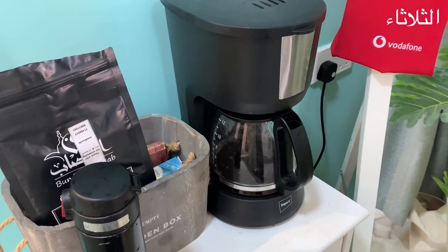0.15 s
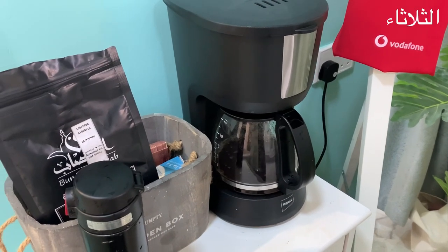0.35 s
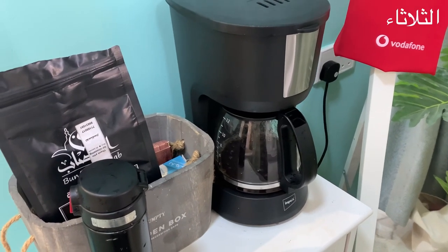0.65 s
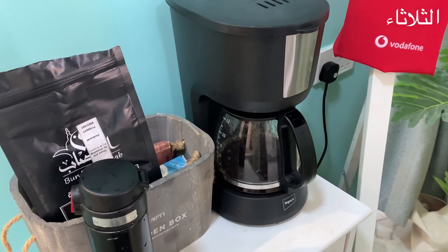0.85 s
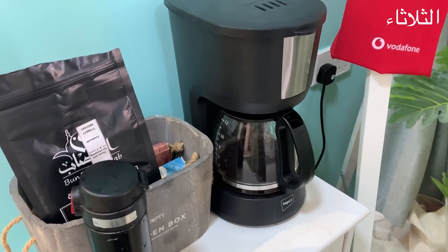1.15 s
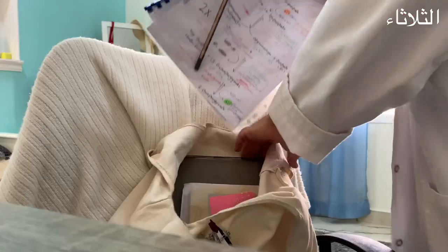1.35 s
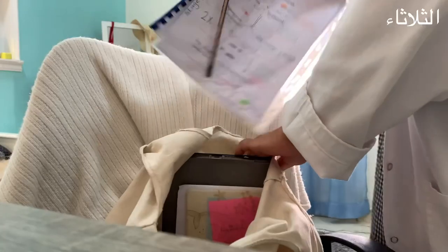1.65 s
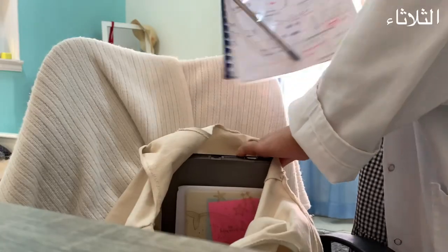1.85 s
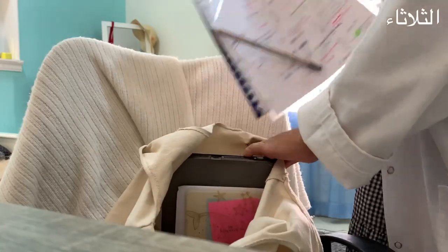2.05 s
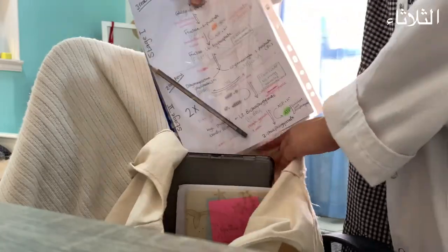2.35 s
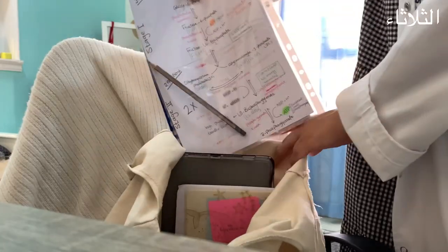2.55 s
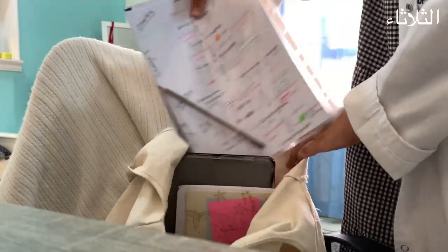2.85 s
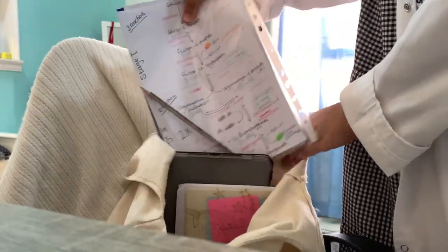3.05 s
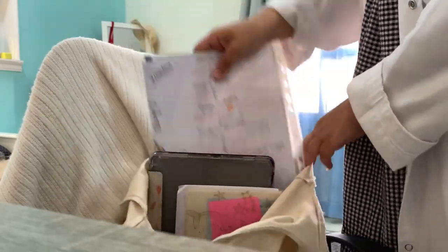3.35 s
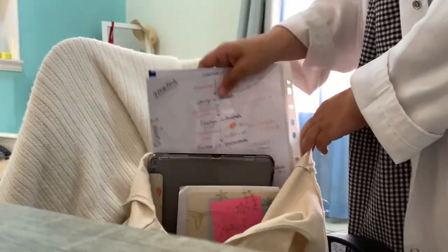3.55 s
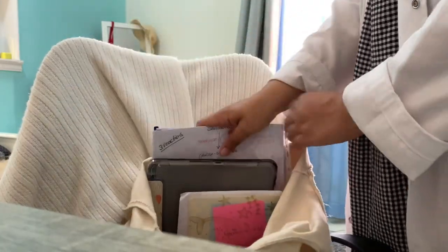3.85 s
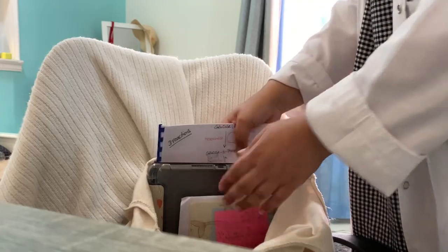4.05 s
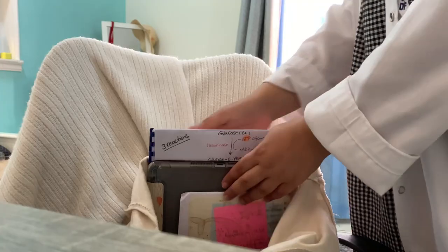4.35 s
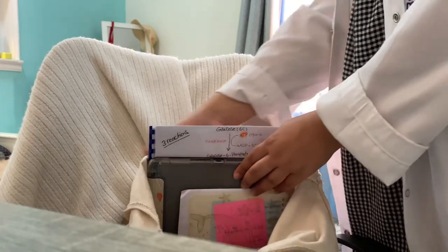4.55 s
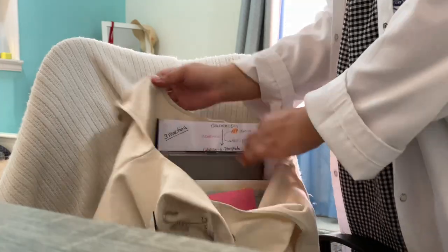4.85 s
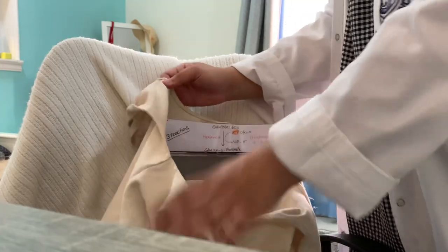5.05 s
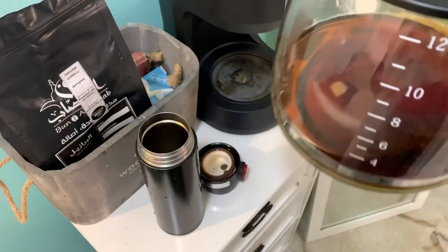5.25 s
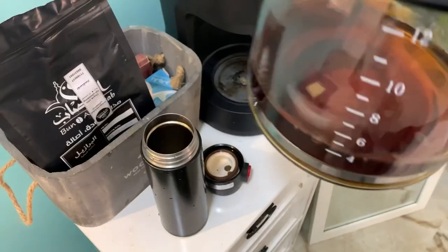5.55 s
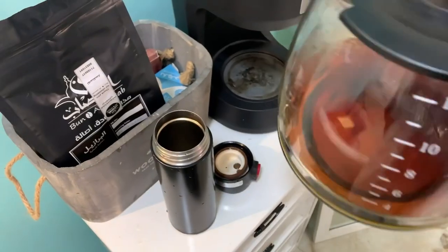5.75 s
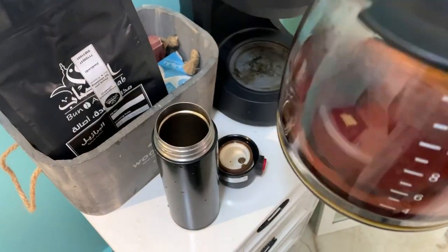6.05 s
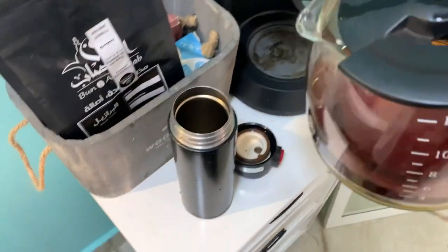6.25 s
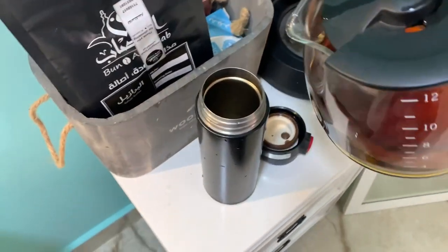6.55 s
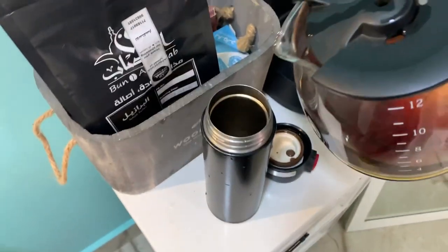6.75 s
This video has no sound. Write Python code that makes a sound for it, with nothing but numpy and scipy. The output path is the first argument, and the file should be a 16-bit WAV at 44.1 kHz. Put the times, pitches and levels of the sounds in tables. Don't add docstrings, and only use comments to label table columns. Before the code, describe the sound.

From 0 to 1.3 s a coffee machine gurgles up close: rapid, uneven, hollow bubble knocks in a plastic housing. A strong gulp and steam spurt hits near 0.53 s, calms around 0.9 s, then bubbling swells from 1.1 s until a hard cut. From 1.3 s cloth drags softly on a chair with light paper snaps; a bright plastic click comes near 1.86 s. Scraping and crackling thicken from 2.3 s, with a low shove at 3.0 s. The folder lands with the heaviest thud at 3.7 s, followed by sharp snaps at 3.9 and 4.2 s and cloth bumps near 4.75 s. At 5.26 s it cuts to a quiet room: sleeve swish until about 5.5 s, tiny glass-lid ticks at 5.7-6.2 s, a soft jug knock and faint slosh at 6.5 s, then nearly only hiss, low room air and barely audible bumps.

```python
import sys
import numpy as np
from scipy import signal
from scipy.fft import rfft, irfft
from scipy.io import wavfile
from scipy.ndimage import uniform_filter1d

SR = 44100
rng = np.random.default_rng(int(sys.argv[2]) if len(sys.argv) > 2 else 0)


def magnitude_from_level(level_db):
    exponent = np.asarray(level_db, float) / 20
    return 10 ** exponent


def persist_wave(psi):
    counts = np.round(np.clip(psi, -1, 1) * 32767).astype(np.int16)
    wavfile.write(sys.argv[1], SR, np.atleast_2d(counts).T)


N = 304290


# [t/s, spray level/dB, build/s, hold/s]
SURGES = [
    (0.0, -60, 0.012, 0.69),
    (.106, -51.5, 0.0061, 0.0069),
    (.46, -58, 0.017, 0.0078),
    (.52, -38.5, 0.027, 0.017),
    (.62, -52, 0.049, 0.0044),
    (.772, -67, .01, 0.013),
    (1.024, -58, 0.064, 0.0085),
    (1.125, -44.5, 0.09, 0.19),
]
STEAM_FALL_DB_S, LULL_DB = 142, -69
GURGLE_TOP_DB, FULL_STEAM_DB, STARVE_PER_DB = -36, -42, 0.024
# [t/s, level/dB, brightness/dB]
GULPS = [(.009, -26, -18.5), (.039, -31.5, -4.5), (.063, -32.5, -7), (.105, -28, -22), (0.119, -20.5, -38),
         (.127, -18.5, -24), (0.145, -25.5, -15.5), (0.165, -26.5, -12), (0.189, -27.5, -13.5),
         (0.207, -21.5, -18), (0.23, -23.5, -12), (0.245, -28, -31), (0.272, -23, -18.5), (.282, -27, -28),
         (.3, -24.5, -28.5), (0.337, -31, -8), (0.369, -21, -21.5), (0.399, -21.5, -23.5),
         (0.423, -27, -10.5), (0.459, -28.5, -2.5), (.463, -24, -24.5), (0.478, -29.5, -13.5),
         (0.494, -27, -18.5), (.516, -23, -28), (.536, -8, -47), (.571, -19, -8), (.592, -19.5, -20),
         (.61, -29, 4.5), (0.619, -29.5, -14.5), (.645, -27, -15.5), (0.661, -30, -18), (0.692, -25.5, -24),
         (0.706, -30.5, -15.5), (.743, -34.5, -7), (0.774, -25, -7), (0.779, -32.5, -9), (.814, -38, -11.5),
         (0.834, -41, -4), (.876, -25.5, -40), (0.92, -42, -13), (1.004, -42, -23), (1.021, -24.5, -5.5),
         (1.03, -23.5, -13), (1.09, -33.5, -6), (1.115, -26.5, -10), (1.137, -25, -20), (1.15, -22.5, -23),
         (1.164, -18.5, -22), (1.182, -19.5, -26), (1.203, -31, -16), (1.218, -20.5, -21),
         (1.249, -22, -25), (1.261, -15.5, -21), (1.3, -25.5, -11)]
GULP_S, SURGE_GULP_S = 0.0043, 0.0083
# [f/Hz, width/Hz, level/dB]
HOUSING = [(251, 59, -6.5), (302, 81, -7), (399.8, 54, -16), (586, 63, -10.5), (901, 71, -6.5),
           (1517, 140, -18.5), (2248, 81, -19.5), (3324, 110, -35.5)]
# [f/Hz, level/dB]
HOUSING_WIDE = [(60, -36.5), (244, 3.5), (443, -15.5), (597, -12.5), (693, -31.5), (888, -3), (1140, -24),
                (6000, -66.5)]
# [f/Hz, level/dB]
COLLAPSE_EDGE = [(400, -6), (1200, -0.5), (2200, -4), (3000, -19.5), (8000, -51)]
# [f/Hz, level/dB]
SPRAY = [(710, -30.5), (1200, 2.5), (2290, -5), (3600, -8), (8210, -21), (11900, -67), (12900, -45),
         (15000, -36.5)]
# [f/Hz, width/Hz, level/dB]
LID = [(1510, 120, 6), (2400, 200, 4), (3494, 110, 3.5), (3860, 140, -6.5)]
# [t/s, level/dB]
DRIPS = [
    (0.32, -76),
    (0.7277, -67),
    (0.9203, -64),
]
# [f/Hz, level/dB, t60/s]
DRIP_MODES = [(4400, -8, 0.19), (2760, -2, .06)]
# [t/s, level/dB, f/Hz]
SPITS = [(0.1042, -42, 2480), (0.112, -48, 2510), (0.514, -31.5, 2580), (0.5292, -24.5, 3940),
         (0.545, -46.5, 3500), (0.5744, -40.5, 2300), (0.5842, -38, 2490), (0.604, -40, 2390),
         (0.615, -35.5, 2340), (0.6544, -58, 3280), (1.0322, -42, 3500), (1.115, -37, 2520),
         (1.1274, -37, 2400), (1.1364, -35, 2520), (1.1644, -43, 2300), (1.223, -47, 3540),
         (1.2314, -51, 2440), (1.262, -46, 2530), (1.3044, -44, 2490)]
CHANGE_TICK_S, CHANGE_TICK_DB = 1.3085, -46


def coffee_machine():
    steam_db = strokes(SURGES, STEAM_FALL_DB_S, LULL_DB)
    short_db = np.maximum(FULL_STEAM_DB - steam_db, 0)
    gurgle = magnitude_from_level(GURGLE_TOP_DB - STARVE_PER_DB * short_db ** 2)
    housing, spray_taps = body(HOUSING_WIDE, HOUSING, -8.0), body(SPRAY, LID)

    gulps = np.zeros((2, N))
    for s, db, bright_db in GULPS:
        length_s = GULP_S + SURGE_GULP_S * magnitude_from_level(-short_db[round(s * SR) + 200])
        shift, tilt = rng.standard_normal((2, len(HOUSING)))
        spot = []
        for (hz, width, mode_db), a, b in zip(HOUSING, shift, tilt):
            detune = 1 + (0.015 if hz > 450 else 0.06) * a
            tone_db = (hz > 400) * 0.75 * (bright_db + 13.0)
            spot.append((hz * detune, width, mode_db + 3.3 * b + tone_db))
        knock = crack(body(HOUSING_WIDE, spot, -9.5), length_s, push=0.76, rise_s=0.00071)
        add(gulps, s, magnitude_from_level(db - 4.0) * knock)
        add(gulps, s, magnitude_from_level(db + bright_db) * crack(body(COLLAPSE_EDGE)[:500], 0.00065))
    for s, db in DRIPS:
        add(gulps, s, magnitude_from_level(db) * modes(DRIP_MODES))
    for s, db, hz in SPITS:
        add(gulps, s, magnitude_from_level(db) * crack(cover(hz) + 0.1 * sleeve(7000, 0.0), 0.0026))
    add(gulps, CHANGE_TICK_S, magnitude_from_level(CHANGE_TICK_DB) * crack(sleeve(6000, 6.0), 0.0015))

    swarm = magnitude_from_level(-3.5) * gurgle * rub(housing, 250, 3.0, 0.5)
    spray = magnitude_from_level(steam_db) * rub(spray_taps, 1500, 2.5, 1.1)
    return room(gulps, -7.0) + swarm + spray


# [t/s, rumble level/dB, build/s, hold/s, rustle re rumble/dB]
PULLS = [(1.333, -48, 0.06, 0.39, -8), (1.493, -48, 0.12, 0.49, -8.5), (2.199, -44, 0.36, 0.21, -9.5),
         (2.588, -46.5, 0.14, 0.57, -6), (3.014, -35, 0.039, 0.05, -8.5), (3.226, -47.5, 0.11, 0.034, -2),
         (3.354, -39, 0.055, 0.011, -3), (3.582, -44, 0.052, 0.042, -2.5),
         (3.694, -35.5, 0.043, 0.016, -0.5), (3.866, -46.5, 0.12, 0.35, -8),
         (4.154, -46.5, 0.024, 0.0041, -4), (4.578, -60, 0.017, 0.016, -3), (4.75, -42.5, 0.36, 0.0057, -7),
         (4.934, -46.5, 0.23, 0.24, -12)]
RUMBLE_FALL_DB_S, RUSTLE_FALL_DB_S, RUMBLE_REST_DB, RUSTLE_REST_DB = 78.5, 101.5, -57, -64
# [f/Hz, width/Hz, level/dB]
CHAIR = [(144, 21, 0), (382, 57, 5), (597, 11, 1), (907, 96, -1.5), (1044, 97, -3.5)]
# [f/Hz, level/dB]
CHAIR_WIDE = [(24, -36), (40, -12), (157, 8.5), (227, -1.5), (333, 2), (495, -26), (910, -36.5),
              (1540, -120)]
# [f/Hz, level/dB]
CLOTH = [(260, -24.5), (560, 0.5), (798, -12), (897, -11), (1380, -7.5), (1950, -20.5), (2600, -19),
         (4000, -70.5)]
# [t/s, scrape level/dB, build/s, hold/s]
SLIDES = [(1.47, -64, 0.13, 0.39), (1.9, -73, .05, 0.27), (2.3, -60, 0.15, 0.046), (2.5, -67, 0.12, 0.029),
          (2.62, -53.5, 0.083, 0.092), (2.88, -57.5, 0.63, 0.037), (3.03, -57.5, 0.14, 0.16),
          (3.35, -50.5, 0.21, 0.053), (3.56, -56.5, 0.18, 0.16), (3.7, -47.5, 0.1, 0.037),
          (3.9, -55.5, 0.2, 0.051), (4.2, -57.5, 0.28, 0.0053), (4.63, -71.5, 0.32, .08),
          (4.76, -62.5, 0.27, 0.046), (1.312, -70, .01, 0.078), (4.85, -73, 0.065, 0.46),
          (3.98, -74, 0.02, 0.2)]
SLIDE_FALL_DB_S, SLIDE_REST_DB = 127, -84
FINE_DB, FINE_SLOPE, FIRM_DB = -63, 1.22, -57.5
# [f/Hz, level/dB]
PAPER = [(1200, -33), (1900, -15.5), (2400, -10.5), (3000, -8), (4000, -6), (4800, -9), (6000, -22.5),
         (8000, -34.5)]
# [f/Hz, level/dB]
FINE = [(2940, -38.5), (5000, -17), (5600, 3), (7440, -4), (10500, -16), (11500, -10.5), (13300, -21),
        (15000, -51)]
# [t/s, level/dB, f/Hz]
SNAPS = [(1.3354, -46.5, 3210), (1.357, -49, 2390), (1.4272, -50, 2930), (1.4734, -43, 3220),
         (1.5848, -47, 3290), (1.696, -46, 2290), (1.7449, -52, 2870), (1.757, -47, 2910),
         (1.7716, -46, 2550), (1.7984, -50, 2680), (1.8422, -44, 2970), (1.9415, -53, 2360),
         (2.2583, -49, 3360), (2.2753, -35.5, 3600), (2.3037, -44, 4530), (2.307, -37, 3240),
         (2.3391, -36, 2930), (2.594, -47, 2930), (2.6076, -45, 3600), (2.6186, -47, 3540),
         (2.645, -36, 3600), (2.6919, -37, 3700), (3.2123, -42, 3900), (2.6295, -34, 3230),
         (2.6638, -34, 3570), (2.6986, -31.5, 3560), (2.825, -36, 4510), (2.87, -31.5, 3820),
         (2.9164, -41, 4350), (2.9412, -38, 4270), (2.9914, -46, 3620), (3.0145, -42, 4330),
         (3.027, -42, 2600), (3.061, -32.5, 3970), (3.2036, -44, 3860), (3.2535, -34.5, 3270),
         (3.3368, -37.5, 4450), (3.3503, -33.5, 3950), (3.429, -38.5, 3700), (3.4412, -36.5, 4260),
         (3.5179, -43, 3850), (3.5369, -37, 3760), (3.5466, -39, 4050), (3.5604, -44.5, 4000),
         (3.5703, -35, 3990), (3.5825, -43, 4130), (3.6082, -32.5, 3660), (3.615, -39, 4110),
         (3.695, -31.5, 4160), (3.8, -43, 2260), (3.8977, -28, 3610), (4.1235, -46, 2940),
         (4.128, -44.5, 4180), (4.154, -44, 2510), (4.1979, -27.5, 4300), (4.6947, -60, 2290),
         (4.7491, -43, 2930), (4.8618, -46.5, 1600), (5.0739, -60.5, 2380)]
# [t/s, level/dB, f/Hz, air/dB]
CLICKS = [(1.3565, -58, 4500, 3), (2.6299, -54, 6000, 4), (3.024, -55, 6000, -2), (3.2123, -53.5, 6500, -4),
          (3.3383, -54, 6000, 4), (3.5704, -51.5, 6020, -4), (3.9404, -51, 6000, 8), (4.0731, -54, 6000, 5),
          (4.1659, -60, 6000, 6), (5.1841, -62, 6000, 8), (1.4735, -46.5, 6200, 10),
          (1.8635, -37, 7200, -10), (2.2736, -57, 5930, 6), (2.302, -48, 6350, -3), (2.308, -47, 5850, 9),
          (2.3387, -44, 5600, 3), (2.6184, -51, 6310, -0.5), (2.8674, -48, 6210, -0.5),
          (2.9164, -62, 5300, 2.5), (3.252, -46, 6640, -11), (3.349, -42.5, 5130, -0.5),
          (3.539, -46, 6160, -4.5), (3.697, -32, 6080, 1), (3.8005, -43.5, 6450, 2),
          (3.897, -30.5, 5100, 6), (4.1777, -49, 8170, -4), (4.196, -31.5, 5000, 5),
          (4.7486, -57, 6430, -8), (4.8618, -56, 5730, -7), (5.1464, -45.5, 5340, 0),
          (5.2016, -46, 5940, 7)]
# [t/s, level/dB, f/Hz, length/s]
SCRAPES = [(2.595, -44.5, 3670, 0.14), (2.642, -41, 3920, 0.079), (2.858, -39, 3640, 0.042),
           (3.227, -45, 4180, 0.047), (3.33, -45.5, 4100, 0.09), (3.587, -48.5, 4170, 0.094),
           (3.886, -39.5, 4100, 0.026), (3.69, -34.5, 3800, 0.025), (5.207, -49, 5520, 0.022)]
# [f/Hz, level/dB]
SCRAPE_TOP = [(3000, -19.5), (5500, 4), (8000, 9.5), (10500, 7.5), (13200, 7.5), (15000, -9)]


def bag():
    rumble_rows = [row[:4] for row in PULLS]
    rustle_rows = [(s, db + rel_db, build_s, hold_s) for s, db, build_s, hold_s, rel_db in PULLS]
    rumble = magnitude_from_level(strokes(rumble_rows, RUMBLE_FALL_DB_S, RUMBLE_REST_DB))
    rustle = magnitude_from_level(strokes(rustle_rows, RUSTLE_FALL_DB_S, RUSTLE_REST_DB))
    drag = rumble * rub(body(CHAIR_WIDE, CHAIR, -0.32), 320, 0.38, 1.0)
    drag = drag + rustle * rub(body(CLOTH), 900, 1.9, 0.97)

    slide_db = strokes(SLIDES, SLIDE_FALL_DB_S, SLIDE_REST_DB)
    fine = magnitude_from_level(FINE_DB + FINE_SLOPE * (slide_db - FIRM_DB))
    paper = magnitude_from_level(slide_db) * rub(body(PAPER), 1800, 2.2, 1.1)
    paper = paper + fine * rub(body(FINE), 2000, 3.0, 1.0)

    snaps, top = np.zeros((2, N)), body(SCRAPE_TOP)[:300]
    for s, db, hz in SNAPS:
        add(snaps, s, magnitude_from_level(db - 0.5) * crack(cover(hz), 0.0025))
    for s, db, hz, air_db in CLICKS:
        add(snaps, s, magnitude_from_level(db + 6.5) * crack(sleeve(hz, air_db), 0.0013))
    for s, db, hz, length_s in SCRAPES:
        size = round(length_s * SR)
        grip = magnitude_from_level(3.5 * rng.standard_normal(200)).repeat(40)
        slips = rng.standard_normal(8000) * grip
        scrape = evened(np.convolve(slips[:size], cover(hz) + 0.045 * top))
        scrape = scrape * signal.windows.tukey(size + 299, 0.5)
        add(snaps, s, magnitude_from_level(db) * np.array([scrape, np.roll(scrape, 4)]))
    return drag + magnitude_from_level(2.5) * paper + room(snaps, -11.0)


# [t/s, level/dB, f/Hz, t60/s]
BUMPS = [(3.018, -34.5, 400, 0.2), (3.355, -34.5, 410, 0.29), (3.583, -28.5, 420, 0.35),
         (3.6935, -19, 1100, .06), (3.72, -12, 370, 0.077), (4.198, -20.5, 1300, 0.053),
         (4.211, -33, 330, 0.059), (3.8, -35.5, 600, .04), (4.695, -31, 364, 0.09),
         (4.749, -28, 380, 0.019), (4.7645, -19, 250, 0.03), (4.765, -30, 980, 0.03), (4.2, -42, 900, .04),
         (4.911, -42, 1300, .025), (4.96, -40, 1280, .025), (4.7495, -27, 1200, 0.052),
         (4.792, -29, 262, 0.045), (4.81, -31, 390, .04), (4.862, -39, 1090, 0.025), (2.391, -37, 600, .04),
         (7.9, -49.5, 700, 0.06), (6.503, -30.5, 530, 0.022), (7.1, -45, 220, .03), (7.7, -51, 840, 0.058),
         (6.452, -60, 650, .1)]
# [t/s, level/dB, rise/s]
DROPS = [
    (3.699, -17, 0.00044),
    (6.4955, -42, 0.0017),
]
# [f/Hz, level/dB, t60/s]
SEAT = [(117, -15.5, 0.12), (381, 5.5, 0.027), (642, 2.5, 0.028), (900, -7.5, 0.042), (1104, -11, 0.07),
        (1354, -4, 0.032), (1740, -10, 0.022)]
# [f/Hz, level/dB, t60/s]
KNOCK = [(480, 6, 0.025), (590, -7, 0.03), (726, 0, 0.034), (846, -13, 0.045)]
# [t/s, level/dB, f/Hz, t60/s]
THUMPS = [
    (0.531, -25.5, 111.3, 0.18),
    (3.018, -25, 153, 0.45),
    (3.712, -31, 109.6, 0.29),
    (4.771, -41, 103.5, 0.37),
    (6.508, -41.5, 78.4, 0.09),
]


def blows():
    out = np.zeros((2, N))
    for s, db, hz, t60 in BUMPS:
        add(out, s, magnitude_from_level(db - 8.0) * ring(hz, t60, 0.23, count=11, rise_s=0.00032))
    for (s, db, rise_s), table in zip(DROPS, (SEAT, KNOCK)):
        add(out, s, magnitude_from_level(db + 5.5) * modes(table, rise_s=rise_s))
    for s, db, hz, t60 in THUMPS:
        add(out, s, magnitude_from_level(db - 1.0) * ring(hz, t60, 0.16, count=3, rise_s=0.01, scatter=0.016))
    return room(out, -7.0)


# [t/s, level/dB, build/s, hold/s]
TIPS = [
    (5.3, -78.5, 0.052, 0.43),
    (6.2, -80, 0.23, .25),
    (6.48, -68, 0.12, 0.09),
    (6.6, -68, 0.05, 0.11),
]
# [f/Hz, level/dB]
SLOSH = [(250, -23), (386, -37), (425, 12), (694, 5.5), (954, -8.5), (2500, -11), (3250, -68), (5500, -120)]
# [t/s, level/dB, build/s, hold/s]
SPOUT_FIZZ = [(6.5, -81.5, .01, 0.17)]
# [t/s, level/dB, build/s, hold/s]
BRUSHES = [(5.15, -62.5, 0.037, 0.025), (5.205, -61.5, 0.015, 0.066), (5.285, -64.5, 0.011, 0.09),
           (5.42, -63, 0.12, 0.095), (5.55, -83, .05, 0.035), (6.5, -69, 0.012, 0.0094)]
BRUSH_FALL_DB_S, TIP_FALL_DB_S = 130, 197.5
# [f/Hz, level/dB]
SWISH = [(590, -62), (1000, -36), (1490, -12.5), (2630, -6.5), (9580, -4), (11900, -11.5), (13800, -11),
         (15100, -43)]
# [t/s, ring level/dB, pitch ratio, tick level/dB, tick f/Hz]
TICKS = [(5.687, -69, 1.1, -80, 4280), (5.732, -90, 0.89, -65, 6720), (5.778, -65, 0.92, -67.5, 3500),
         (5.782, -90, 1., -54, 10400), (5.783, -90, 1., -57.5, 13500), (6.03, -66.5, 1., -79, 3800),
         (6.04, -59, 0.98, -58, 6590), (6.215, -74, 1., -62.5, 3680)]
# [f/Hz, level/dB, t60/s]
JUG_MODES = [(2194, -16.5, 0.047), (2860, -13.5, 0.044), (3800, -6, 0.028), (4320, -9, 0.026),
             (6430, -14, 0.02)]


def jug():
    slosh = magnitude_from_level(strokes(TIPS, TIP_FALL_DB_S, -89.0))
    swish = magnitude_from_level(strokes(BRUSHES, BRUSH_FALL_DB_S))
    ticks = np.zeros((2, N))
    for s, db, pitch, tick_db, tick_hz in TICKS:
        add(ticks, s, magnitude_from_level(db - 1.5) * modes(JUG_MODES, pitch))
        add(ticks, s, magnitude_from_level(tick_db) * crack(cover(tick_hz), 0.0028))
    carried = np.arange(N) / SR >= JOINS[1]
    liquid = carried * slosh * rub(body(SLOSH, [(760, 160, 13)]), 1500, 1.5, 1.5)
    spout = body([(6000, -41.5), (8500, -20), (11000, -42.0)], [(8500, 820, 0.0012)])
    liquid += magnitude_from_level(strokes(SPOUT_FIZZ, 200)) * rub(spout, 3000, 1.5, 1.5)
    return liquid + swish * rub(body(SWISH), 4016, 2.0, 1.7) + room(ticks, -3.0)


# [f/Hz, level/dB]
FLOOR = [(24, -13), (122, -4), (260, -18), (304, -12.5), (384, -24), (2140, -44), (3500, -41),
         (15100, -45.5)]
FLOOR_DB = -61.5
# [centre t/s, level/dB, half width/s]
SWELLS = [(.28, -56.5, 0.09), (.63, -49.5, 0.16), (.97, -51, 0.081), (1.24, -56.5, 0.071), (1.6, -59, 0.1),
          (2.499, -48, 0.29), (3.15, -49, 0.22), (3.85, -51.5, 0.25), (4.8, -51, 0.092), (5.5, -61, 0.26),
          (6.4, -63.5, 0.16)]
HUM_HZ, HUM_WANDER = 52.0, 0.08


def background():
    wander = evened(uniform_filter1d(uniform_filter1d(rng.standard_normal(N), 5000), 5000))
    hum = np.sqrt(2) * np.sin(2 * np.pi * np.cumsum(HUM_HZ * (1 + HUM_WANDER * wander)) / SR)
    t = np.arange(N) / SR
    swell = np.sqrt(sum(magnitude_from_level(db) ** 2 * np.exp(-((t - s) / half_s) ** 2) for s, db, half_s in SWELLS))
    return magnitude_from_level(FLOOR_DB) * rub(body(FLOOR), 3000, 1.5, 3.0) + swell * hum


def strokes(rows, fall_db_s, rest_db=-110):
    t = np.arange(0, N, 32) / SR
    power = magnitude_from_level(rest_db) ** 2
    for s, db, build_s, hold_s in rows:
        build_db = 30 * np.maximum(s - t, 0) / max(build_s, 1e-3)
        fall_db = fall_db_s * np.maximum(t - s - hold_s, 0)
        power = power + magnitude_from_level(db - build_db - fall_db) ** 2
    return np.interp(np.arange(N) / SR, t, 10 * np.log10(power))


def rub(taps, per_s, spread_db, smooth, alike=0.53, order=3):
    sizes = magnitude_from_level(spread_db * np.minimum(rng.exponential(1, N), 4))
    slips = sizes * (rng.random(N) < per_s / SR)
    noise = rng.standard_normal((2, N))
    drive = evened(slips * np.sign(noise)) + smooth * noise
    alike = np.clip(alike, 0, 1)
    drive[1] = alike * np.roll(drive[0], order) + np.sqrt(1 - alike ** 2) * drive[1]
    return evened(signal.oaconvolve(patchy(drive, 3.0), taps[None], axes=1)[:, :N])


def patchy(x, depth_db):
    z = signal.stft(x, nperseg=512)[2]
    field = uniform_filter1d(uniform_filter1d(rng.standard_normal(z.shape[1:]), 8, 0), 5, 1)
    return signal.istft(z * magnitude_from_level(depth_db * evened(field)), nperseg=512)[1][:, :N]


def crack(taps, length_s, push=0.0, rise_s=1e-4):
    t = np.arange(900) / SR
    puff = (push + rng.standard_normal((2, 900))) * np.exp(-t / length_s) * (1 - np.exp(-t / rise_s))
    ports = np.array([puff[0], 0.75 * np.roll(puff[0], 2) + 0.6 * puff[1]])
    x = signal.fftconvolve(ports, taps[None], axes=1)
    return x / abs(x).max()


def ring(hz, t60, spread, count, rise_s, scatter=0.088):
    t = np.arange(SR // 3) / SR
    offsets = spread * np.linspace(-1, 1, count) + scatter * rng.standard_normal(count)
    f = hz * np.exp(offsets)[:, None]
    x = np.sin(2 * np.pi * f * t).sum(0) * magnitude_from_level(-60 * t / t60) * (1 - np.exp(-t / rise_s))
    return x / abs(x).max()


def modes(table, pitch=1, rise_s=0.0033):
    t = np.arange(SR // 3) / SR
    x = sum(magnitude_from_level(db - 60 * t / t60) * np.sin(2 * np.pi * hz * pitch * t) for hz, db, t60 in table)
    x = -x * (1 - np.exp(-t / rise_s))
    return x / abs(x).max()


def cover(hz):
    wide = [(hz / 4, -34), (hz, -18), (2.48 * hz, -28), (4 * hz, -50)]
    return body(wide, [(hz, 0.3 * hz, 0.0)])[:300]


def sleeve(hz, air_db):
    hump = [(hz / 3, -24), (hz, 0.0)]
    air = [(10500, -6 + 0.4 * air_db), (13000, -5.5 + air_db), (14500, -11.0 + air_db), (16500, -60)]
    return body(hump + air)[:300]


def body(wide, peaks=(), wide_db=0.0):
    hz = abs(np.fft.fftfreq(8192, 1 / SR))
    power = magnitude_from_level(read(wide, hz) + wide_db) ** 2
    for f, width, db in peaks:
        power = power + magnitude_from_level(db) ** 2 / (1 + (2 * (hz - f) / width) ** 2) ** 2
    log_gain = np.log(power + 1e-11) / 2
    minimum_phase = np.exp(np.conj(signal.hilbert(log_gain)))
    taps = np.fft.ifft(minimum_phase).real[:4096]
    return taps / np.linalg.norm(taps)


# [f/Hz, t60/s]
ROOM = [(100, 0.84), (500, 0.25), (2000, 0.12), (8000, 0.17)]


def room(x, wet_db):
    taps = np.zeros((2, SR // 2))
    grid = np.arange(100, SR // 2 - 20, 20)
    at = grid + rng.integers(0, 20, (2, len(grid)))
    np.put_along_axis(taps, at, rng.choice([-1.0, 1.0], at.shape), 1)
    hz, t, z = signal.stft(taps, SR, nperseg=256)
    tail = signal.istft(z * magnitude_from_level(-60 * t / read(ROOM, hz)[:, None]), SR, nperseg=256)[1]
    tail = tail / np.linalg.norm(tail[0])
    return x + magnitude_from_level(wet_db) * signal.fftconvolve(x, tail, axes=1)[:, :N]


def evened(x):
    return x / np.sqrt(np.mean(x ** 2) + 1e-20)


def read(points, hz):
    f, value = np.transpose(points)
    return np.interp(np.log(hz + 1), np.log(f + 1), value)


def add(mix, s, sound):
    part = mix[:, round(s * SR):][:, :sound.shape[-1]]
    part += sound[..., :part.shape[1]]


JOINS = (1.311, 5.263)


def scene():
    t = np.arange(N) / SR
    first, second = JOINS
    takes = coffee_machine() * (t < first) + bag() * (t >= first) * (t < second) + jug()
    fade = np.prod([np.where(t < s, 1, np.clip((t - s) / 0.02, 0.1, 1)) for s in JOINS], axis=0)
    return (takes + blows() + background()) * fade


def roll_off(x):
    return signal.sosfilt(signal.butter(12, 15240, fs=SR, output="sos"), x)


# [f/Hz, level/dB]
WIDTH = [(60, -8.5), (270, -11.5), (560, 3), (1500, 3), (5000, -4), (14000, -2.5)]
# [f/Hz, level/dB]
OVERALL_COLOUR = [(28, -20), (46, 0.5), (10900, 1), (11400, -25.5), (12200, -32.5), (12450, 0), (14300, -6),
                  (15200, -25)]


def record(dry):
    mid, side = dry[0] + dry[1], dry[0] - dry[1]
    hz = np.fft.rfftfreq(N, 1 / SR)
    narrow = magnitude_from_level(read(WIDTH, hz))
    colour = magnitude_from_level(read(OVERALL_COLOUR, hz)) / 2
    mid = irfft(rfft(mid) * colour, N)
    side = irfft(rfft(side) * colour * narrow, N)
    return roll_off(np.array([mid + side, mid - side]))


dry = scene()
out = record(dry)
persist_wave(out)
```